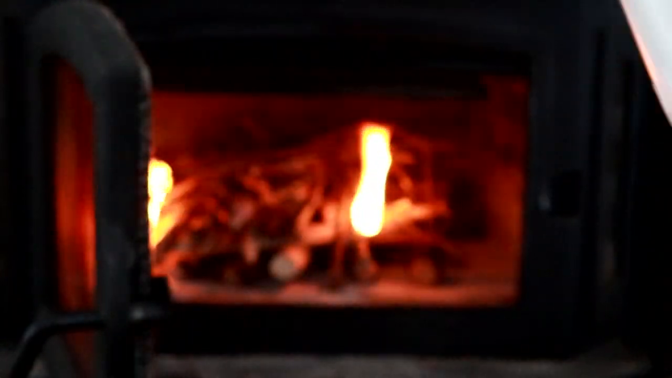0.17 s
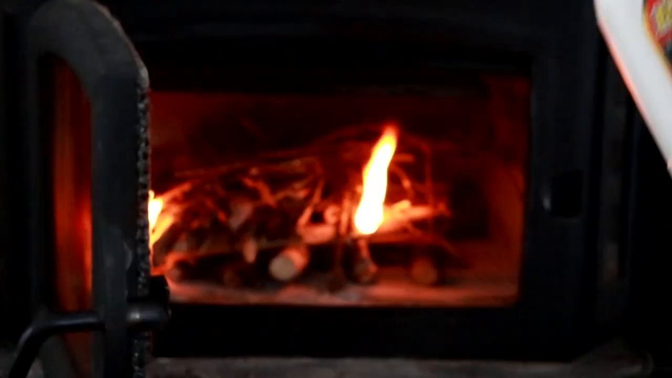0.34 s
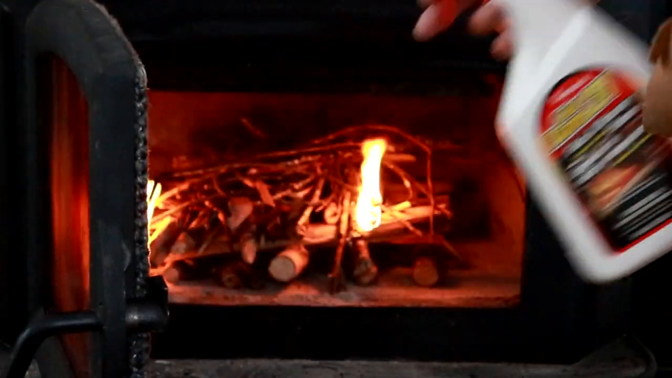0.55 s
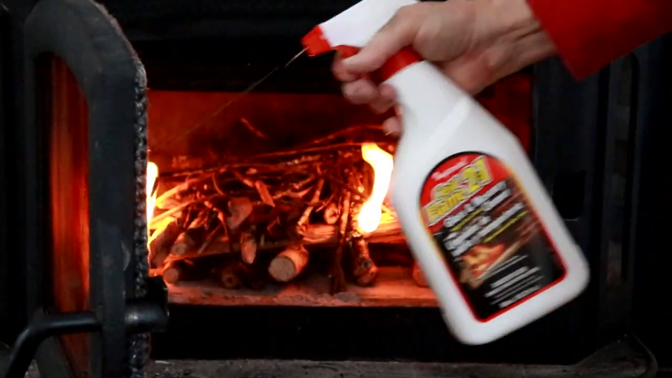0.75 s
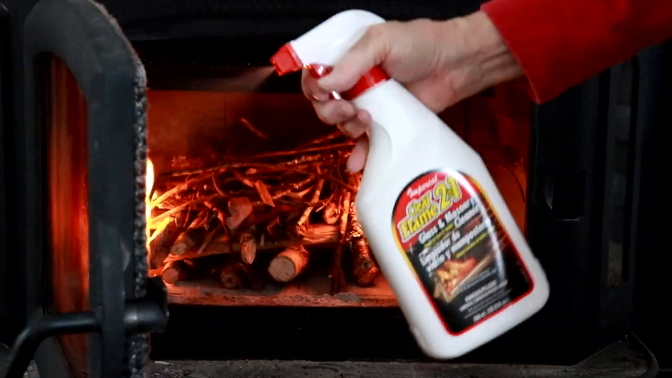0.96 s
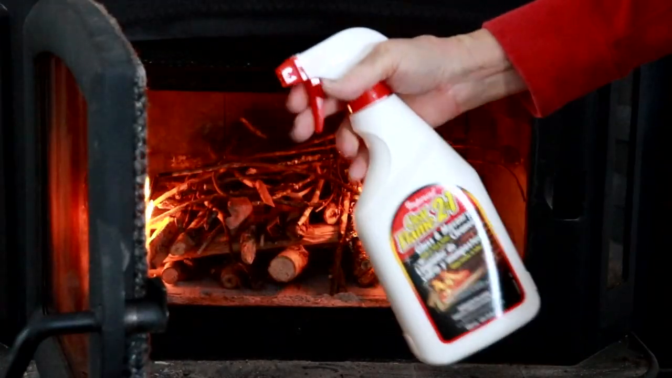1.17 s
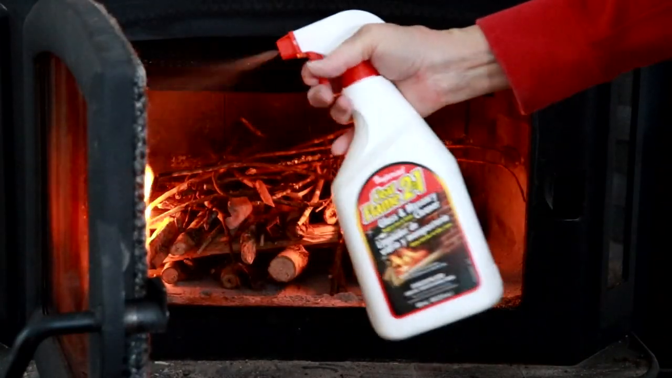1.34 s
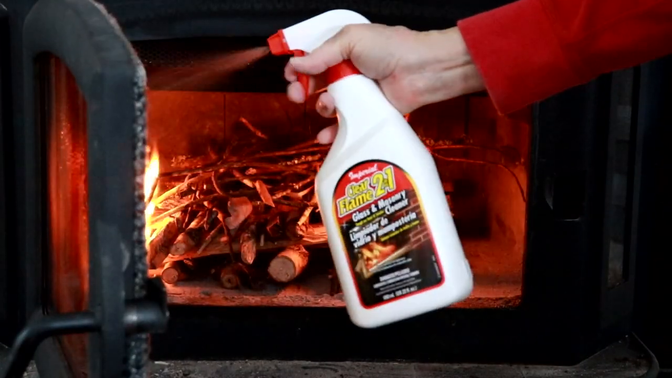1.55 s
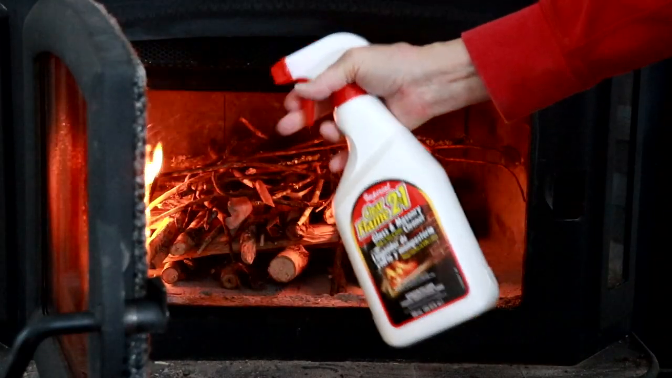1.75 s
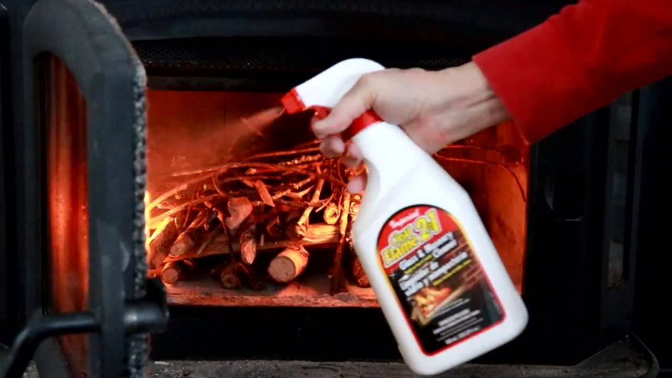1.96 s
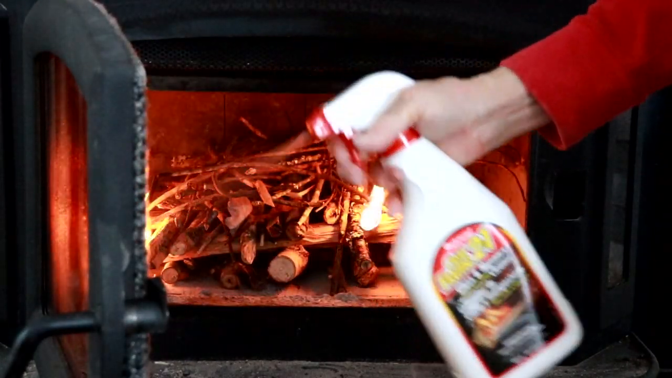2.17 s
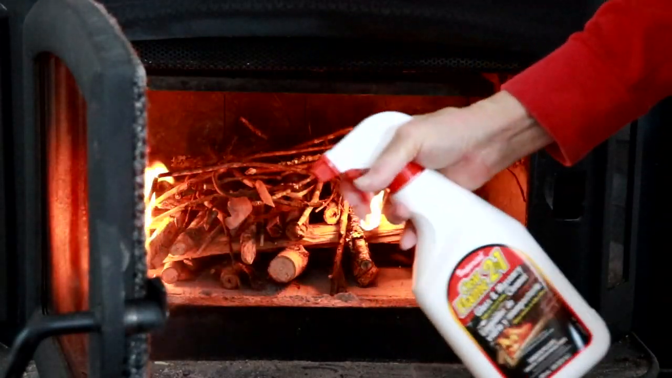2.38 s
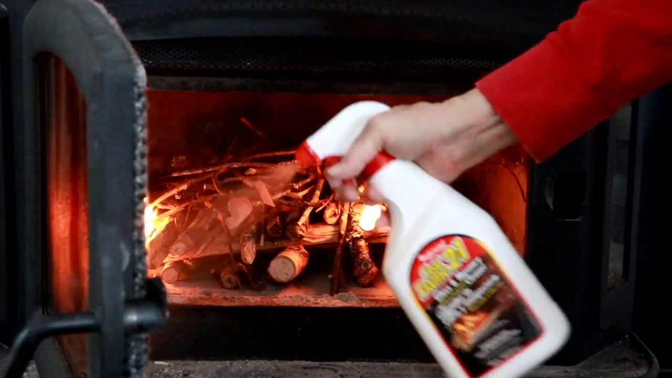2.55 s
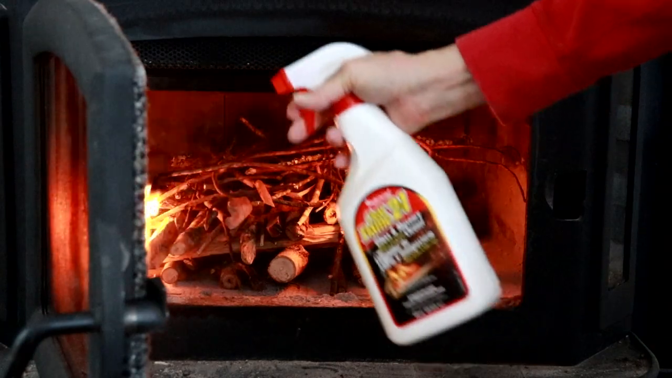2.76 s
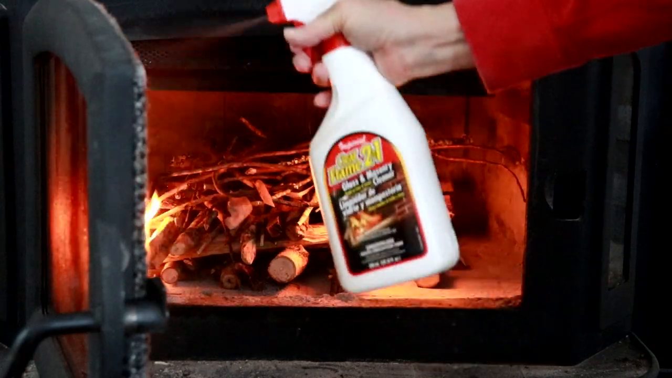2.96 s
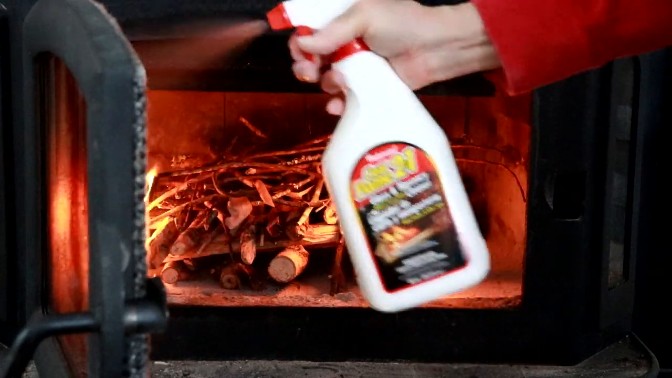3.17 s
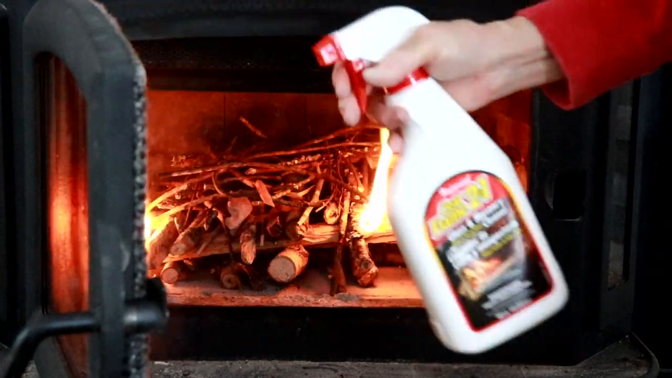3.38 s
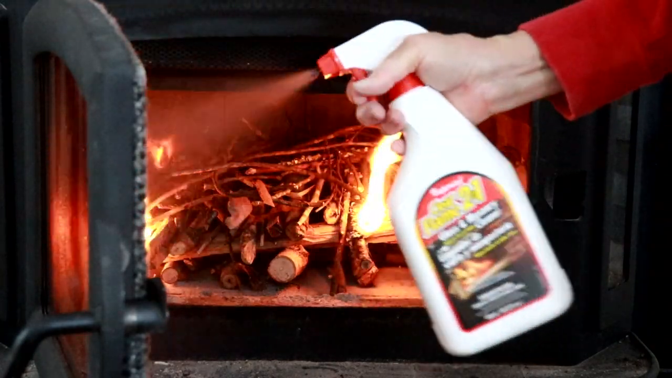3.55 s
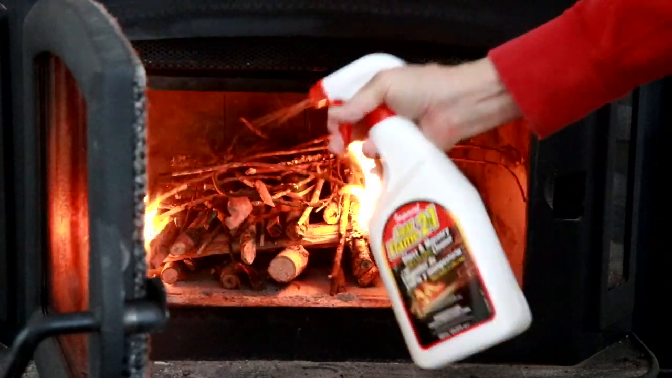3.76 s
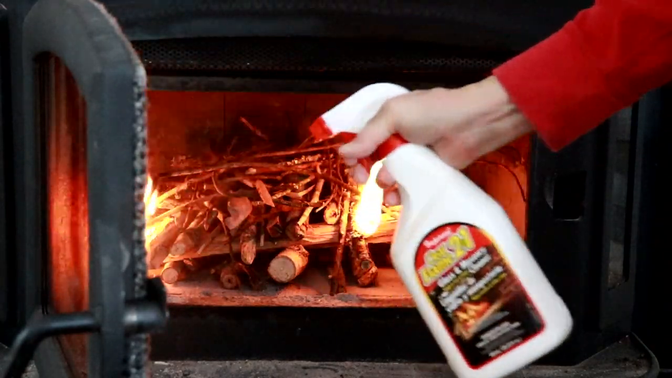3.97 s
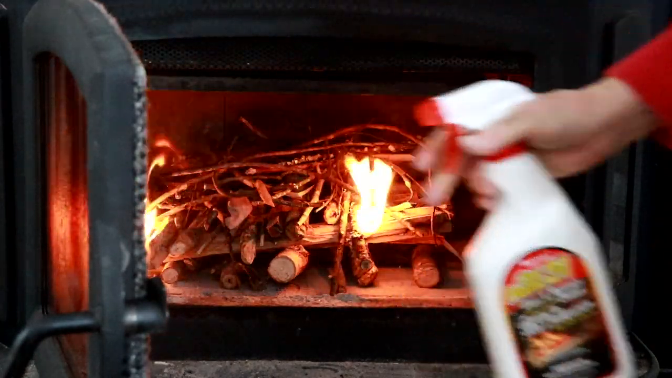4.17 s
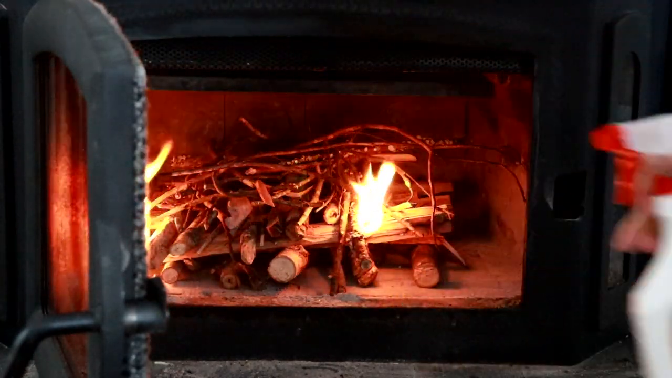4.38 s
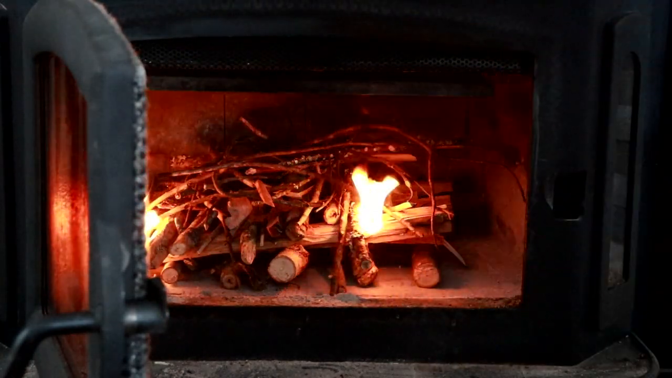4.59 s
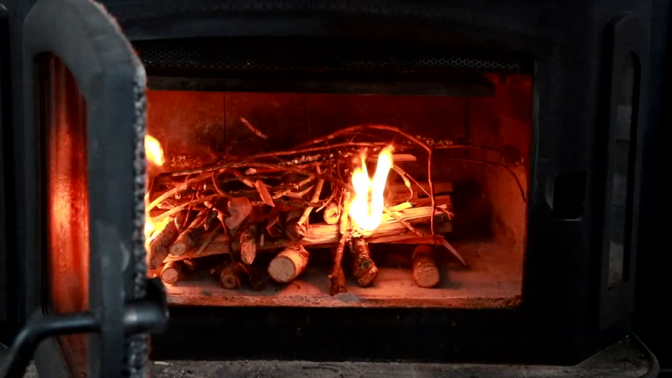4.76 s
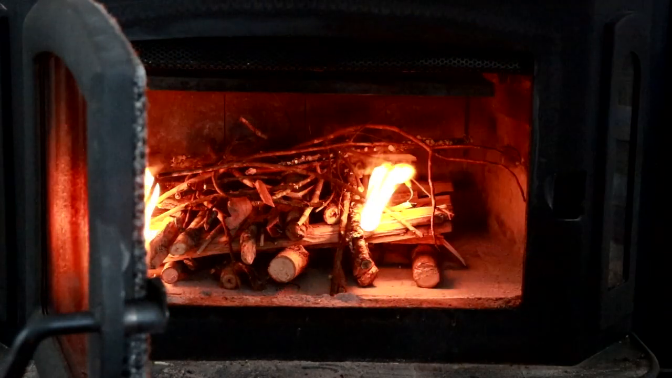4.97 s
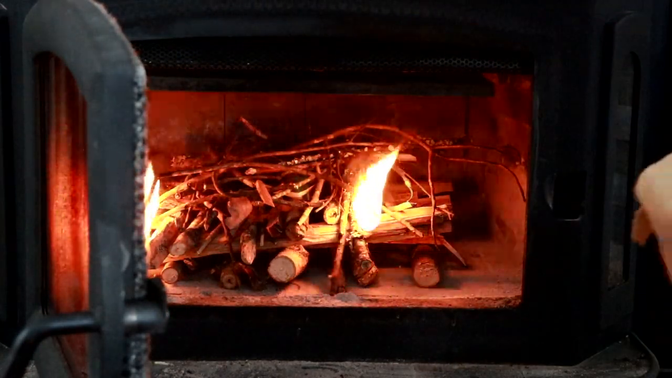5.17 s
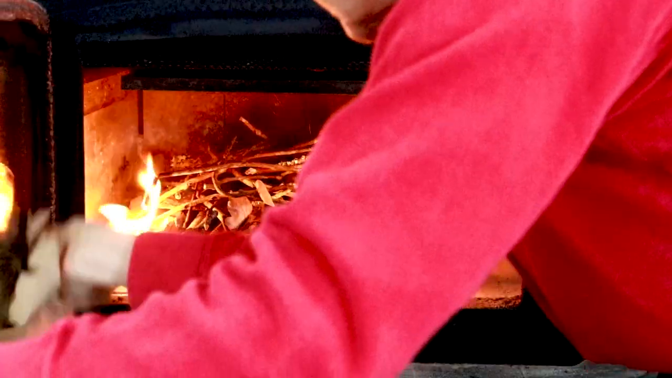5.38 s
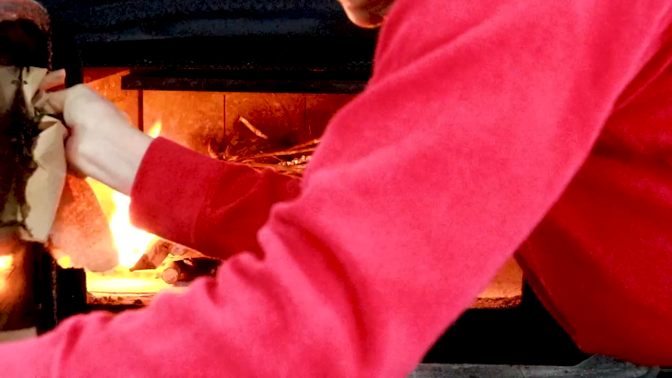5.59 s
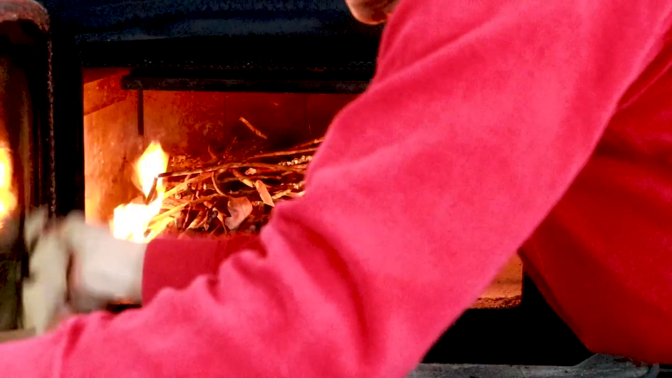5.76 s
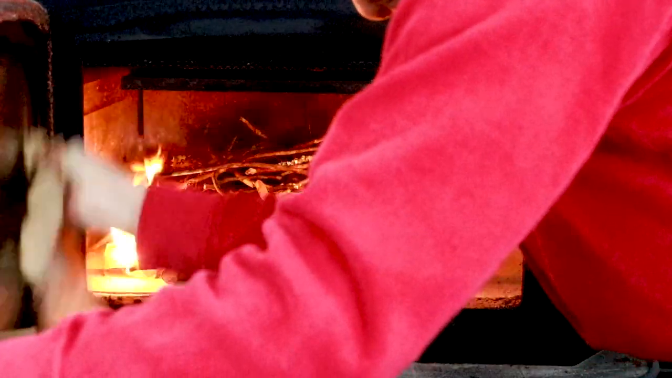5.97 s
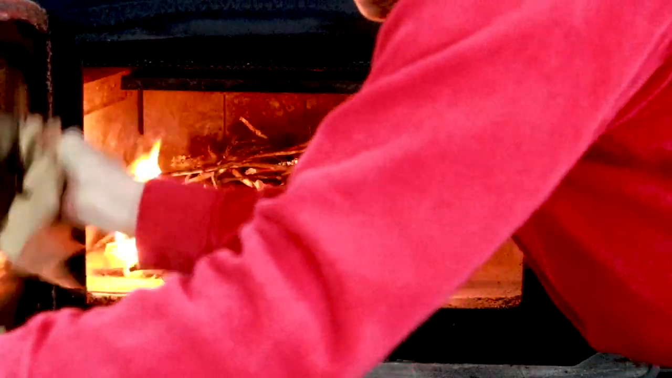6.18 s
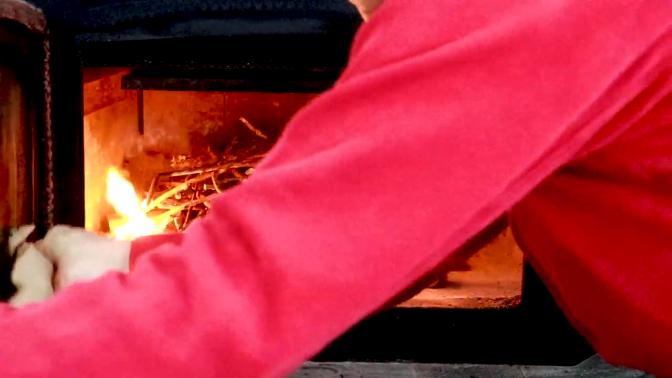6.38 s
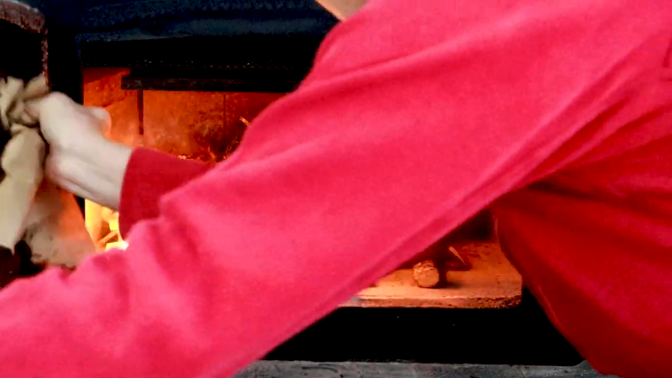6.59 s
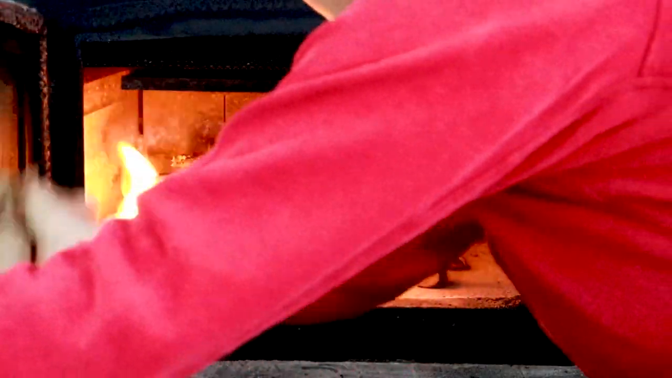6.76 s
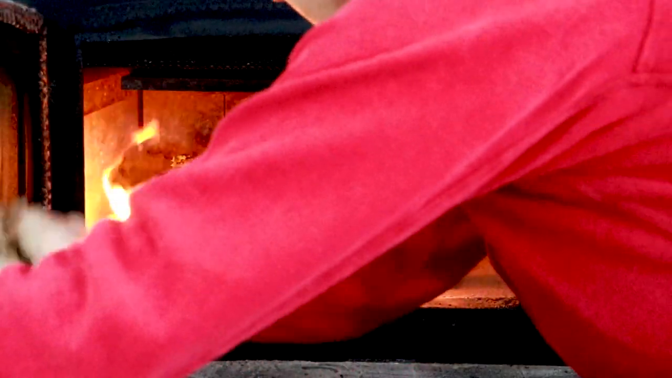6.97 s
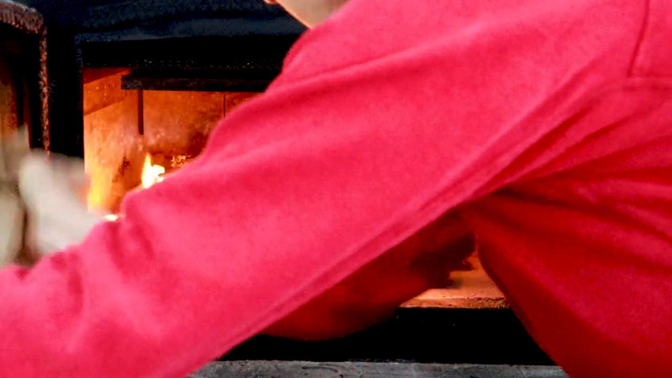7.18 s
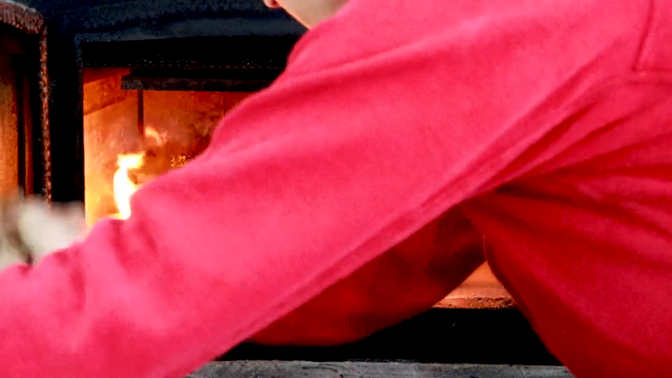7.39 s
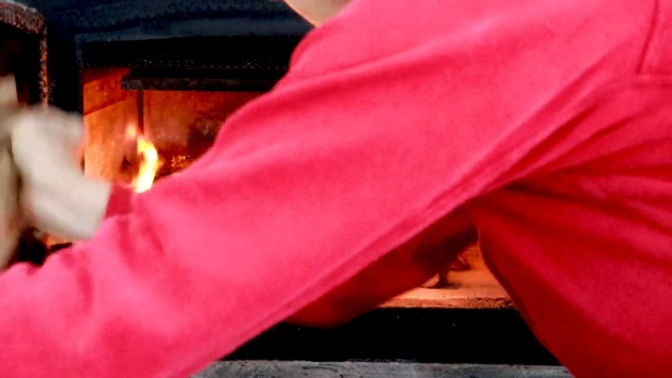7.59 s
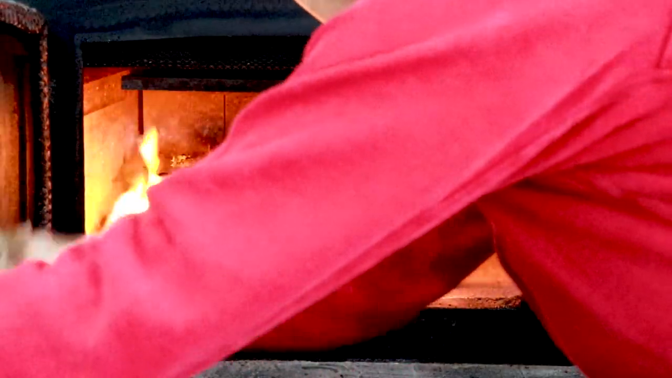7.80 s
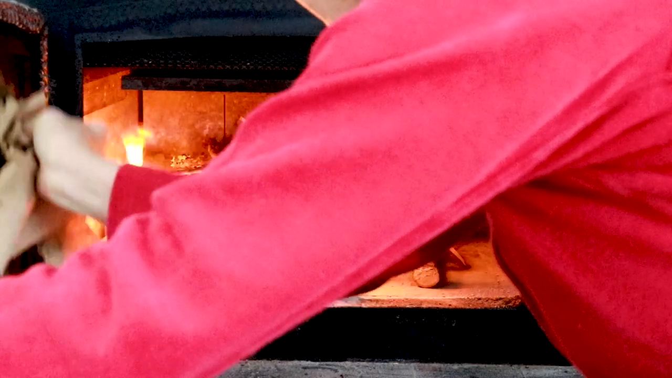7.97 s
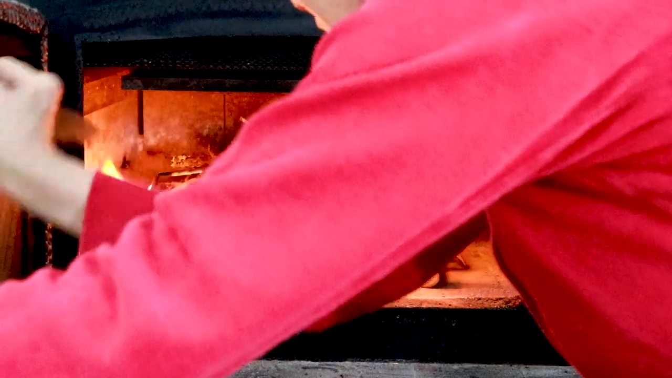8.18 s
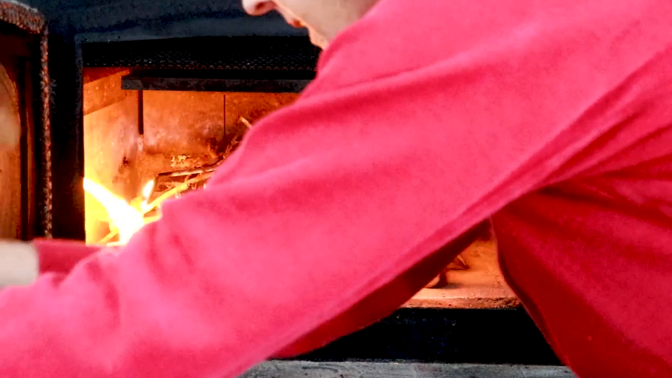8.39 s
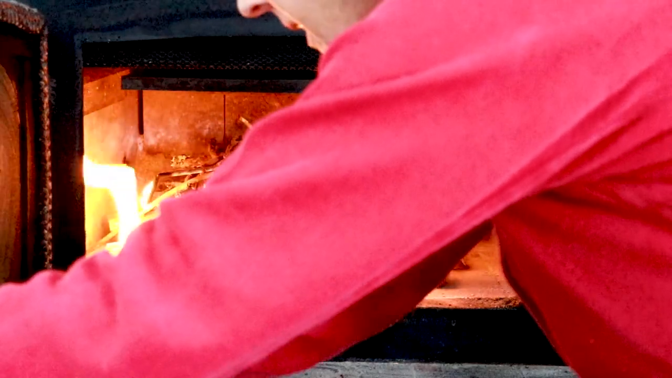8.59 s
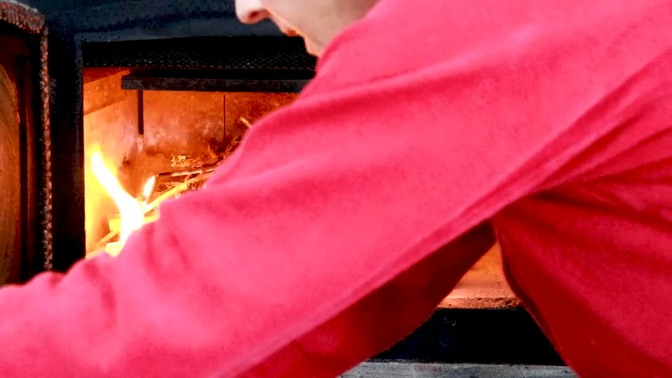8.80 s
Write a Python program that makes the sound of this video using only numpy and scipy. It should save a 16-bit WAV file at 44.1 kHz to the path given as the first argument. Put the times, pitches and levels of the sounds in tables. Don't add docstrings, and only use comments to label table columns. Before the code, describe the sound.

A trigger spray bottle bumps, clicks and hisses in steady squeezes, drops pattering on glass, then a wet rag scrubs the pane briskly indoors.

```python
import sys
import numpy as np
from scipy import signal
from scipy.fft import rfft, irfft, next_fast_len
from scipy.io import wavfile
from scipy.ndimage import uniform_filter1d, map_coordinates

SR = 44100
rng = np.random.default_rng(int(sys.argv[2]) if len(sys.argv) > 2 else 0)


def invert_db(x):
    u = np.asarray(x, float) / 20
    return 10 ** u


def master(y):
    cut = np.clip(np.atleast_2d(y).T, -1, 1)
    pcm = np.round(cut * 32767)
    wavfile.write(sys.argv[1], SR, pcm.astype(np.int16))


N = 389844

# [pull t/s, click level/dB, loudest ring f/Hz, flow level/dB, wait until full flow/s]
SQUEEZES = [(1.6224, -24, 7450, -40, 0.073), (1.93, -22, 2300, -38, 0.082),
            (2.258, -21, 3000, -38.5, 0.085), (2.573, -22, 2720, -38.5, 0.079),
            (2.894, -20, 3170, -39, 0.078), (3.219, -20, 6440, -38.5, 0.08),
            (3.534, -23, 2900, -37.5, 0.069), (3.8622, -17.5, 6600, -40, 0.08)]
# [f/Hz, likeness 0..1]
NEAR_ALIKE = [(300, 1), (1400, 0.98), (3000, 0.52), (7000, 0.42), (15000, 0.57)]


def unit(x):
    return x / np.sqrt(np.mean(x ** 2) + 1e-20)


def along(points, hz):
    f, v = np.transpose(points)
    return np.interp(np.log(hz + 1), np.log(f + 1), v)


def wobble(rate):
    knots = rng.standard_normal(int(N * rate / SR) + 4)
    return map_coordinates(knots, [np.arange(N) * rate / SR])


def filtered(x, response):
    m = next_fast_len(N + SR // 2)
    return irfft(rfft(x, m) * response(np.fft.rfftfreq(m, 1 / SR)), m)[..., :N]


def resonance(f, centre_hz, width_hz):
    return 1j * f * width_hz / (centre_hz ** 2 - f * f + 1j * f * width_hz)


def high_pass(x, corner_hz):
    return filtered(x, lambda f: (1j * f / (corner_hz + 1j * f)) ** 3)


def curve(*tables):
    t = np.arange(N) / SR
    return sum(invert_db(np.interp(t, *np.transpose(table), -200, -200)) for table in tables)


def swells(rows):
    power, t = np.full(N, 1e-20), np.arange(N) / SR
    for s, hold, db, rise, fall, *start in rows:
        rise, fall = np.clip([rise, fall], .001, 1)
        first = max(s - 6 * rise, 0, *start)
        near = slice(round(first * SR), round((s + hold + 6 * fall) * SR))
        early = (s - t[near]) / rise
        late = (t[near] - s - hold) / fall
        away = np.maximum(np.maximum(early, late), 0)
        power[near] += invert_db(db - 10 * away ** 0.98) ** 2
    return np.sqrt(power)


def rush(spectrum, alike, patchy_db, grit_db, left_lead, shape=None):
    grains = invert_db(grit_db * wobble(900)) * rng.standard_normal((2, N))
    hz, t, z = signal.stft(grains, SR, nperseg=512)
    field = uniform_filter1d(rng.standard_normal(z.shape[1:]), 6, 0)
    field = uniform_filter1d(field, 8, 1)
    z = z * invert_db(np.clip(patchy_db, 0, 1.2) * unit(field) + along(spectrum, hz)[:, None])
    if shape:
        z = z * shape(hz[:, None], t)
    turn = np.arccos(np.clip(along(alike, hz), -1, 1))[:, None] / 2
    mid, side = z[0] * np.cos(turn), z[1] * np.sin(turn)
    lead = np.exp(1j * np.pi * hz * left_lead / 1000)[:, None]
    pair = np.array([(mid + side) * lead, (mid - side) / lead])
    return unit(signal.istft(pair, nperseg=512)[1][:, :N])


def ring(modes, t, spread):
    luck = rng.standard_normal((len(modes), 2))
    total = 0
    for (hz, db, t60), (strength, detune) in zip(modes, luck):
        fade = invert_db(db + 2.5 * strength - 60 * t / t60)
        total = total + fade * np.sin(2 * np.pi * hz * (1 + spread * detune) * t)
    return total


def air():
    # [f/Hz, level/dB per Hz]
    draught_colour = [(15, -50), (25, -20), (49, -2.5), (148, -14), (183, -9), (281, -8), (349, -14),
                      (410, -8), (722, -11.5), (804, -10.5), (7700, -18), (15500, -27)]
    # [f/Hz, likeness 0..1]
    air_alike = [(60, 0.33), (180, 0.24), (550, 0.36), (1650, 0.33), (4970, 0.026), (15000, 0.06)]
    # [f/Hz, level/dB per Hz]
    fleece = [(120, -31), (200, -7.5), (419, -16.5), (459, -8), (560, -14.5), (1410, -9.5), (1630, -8.5),
              (4160, -13), (15000, -28.5)]
    # [t/s, level/dB]
    sleeve = [
        [(0.0, -45.5), (0.222, -42.5), (0.49, -53.5), (0.508, -66), (0.56, -57), (0.632, -43), (0.72, -47)],
        [(4.11, -58), (4.25, -62.5), (4.446, -50.5), (4.462, -65), (4.7, -70)],
    ]
    # [t/s, level/dB]
    far_sleeve = [(4.7, -72.5), (4.9, -53), (5.086, -49.5), (5.156, -43.5), (5.27, -56)]
    draught = rush(draught_colour, air_alike, patchy_db=3.0, grit_db=1.46, left_lead=.001)
    draught = invert_db(-50 + 0.13 * wobble(2.94)) * draught
    note = filtered(rng.standard_normal(N), lambda f: resonance(f, centre_hz=66.4, width_hz=12.0))
    rustle = rush(fleece, [(300, .6), (3000, .3)], patchy_db=1.2, grit_db=2.5, left_lead=-.19)
    far = curve(far_sleeve) * filtered(rustle, lambda f: 1 / (1 + (f / 2600) ** 2))
    near = curve(*sleeve) * invert_db([[-1.5], [1.5]]) * rustle
    return draught + invert_db(-65.5) * unit(note) + far + near


def room(x):
    # [f/Hz, t60/s]
    walls = [(200, 0.54), (2000, 0.67), (10000, 0.19)]
    # [f/Hz, likeness 0..1]
    walls_alike = [(250, .8), (900, 0)]
    hz, t, z = signal.stft(rng.standard_normal((2, SR // 2)), SR, nperseg=256)
    turn = np.arccos(along(walls_alike, hz))[:, None] / 2
    z = z[0] * np.cos(turn) + z[1] * np.sin(turn) * [[[1]], [[-1]]]
    fade = invert_db(-60 * t / along(walls, hz)[:, None])
    tail = signal.istft(z * fade, SR, nperseg=256)[1]
    late = np.pad(x, (150, 0))[None]
    return signal.fftconvolve(late, tail / np.linalg.norm(tail[0]), axes=1)[:, :N]


def knocks():
    # [t/s, peak level/dB, hardness/dB per octave]
    bumps = [(.379, -39.5, 9.5), (.399, -39, 7), (0.5055, -22.5, 1), (.55, -38, -6), (.536, -37, -2),
             (0.692, -39, 11.5), (0.726, -40, 6), (0.9763, -16, 5.5), (.996, -17, -5), (1.049, -26.5, -14),
             (1.074, -42.5, 14)]
    # [f/Hz, level/dB, t60/s]
    shell = [(147, -9.5, .1), (227.5, -2.5, .15), (274.6, 2.5, 0.12), (526, -8, .05), (710, -14, .09),
             (936, -10, 0.053), (1230, -15, 0.027)]
    # [f/Hz, level/dB per Hz]
    thud = [(120, -5), (300, 2.5), (600, 1.5), (1400, -10), (2500, -18), (6000, -30)]
    # [t/s, level/dB]
    slosh = [
        (0.52, -40),
        (0.578, -45),
        (0.64, -59),
        (0.768, -54),
        (0.86, -71),
    ]
    out, slaps, t = np.zeros(N + SR), np.zeros(N + SR), np.arange(SR // 4) / SR
    pistons = [(s + 0.012, -39.5, -6) for s, *_ in SQUEEZES]
    for s, db, hard_db in bumps + pistons:
        modes = [(hz, level + hard_db * np.log2(hz / 280), t60) for hz, level, t60 in shell]
        at = round(s * SR)
        out[at:][:len(t)] += invert_db(db - 12.5) * ring(modes, t, spread=0.034)
        slaps[at:][:len(t)] += invert_db(db + hard_db - 19.5 - 60 * t / 0.25)
    slap = slaps[:N] * rush(thud, [(300, 0.99), (1400, 0.45)], patchy_db=0.0, grit_db=4.5, left_lead=.001)
    heave_colour = [(20, -1.0), (35, 0), (90, -11), (200, -17), (400, -92)]
    heave = rush(heave_colour, [(50, 1.0)], patchy_db=.5, grit_db=0.0, left_lead=.001)
    return high_pass(out[:N], corner_hz=45), slap + curve(slosh) * heave


def froth():
    # [t/s, hold/s, level/dB]
    foam = [(6.783, 0.021, -41), (6.838, 0.015, -40), (7.79, .03, -54), (7.95, .05, -55),
            (8.187, .012, -46), (8.25, .09, -53), (8.36, .03, -48), (8.42, 0.12, -54), (8.542, .012, -42.5),
            (8.57, 0.11, -46.5), (8.686, 0.036, -44.5)]
    colour = [(5000, -19), (8500, 0.5), (11000, -2), (13500, -7), (16000, -15)]
    bursts = swells([(*row, 0.0033, 0.032) for row in foam])
    return bursts * invert_db(-2.0) * rush(colour, NEAR_ALIKE, patchy_db=-4.0, grit_db=2.5, left_lead=0.11)


def rag():
    # [t/s, hold/s, scrub level/dB, rise/s for 10 dB, fibre over scrub/dB]
    strokes = [(5.2755, 0.013, -46, -0.1, -2.5), (5.29, 0.15, -48, 0.02, -7), (5.483, 0.046, -45.5, 0, -2),
               (5.553, 0.05, -37, 0.0273, -0.5), (5.63, .045, -39, .03, 0), (5.771, 0.14, -44, 0.02, -4),
               (6.1, 0.035, -41, 0.05, -2.5), (6.22, 0.071, -47, 0.2, -6), (6.343, 0.04, -41.5, 0.02, -2.5),
               (6.45, 0.092, -52, 0.2, -18), (6.569, 0.035, -41.5, 0, -4), (6.631, 0.035, -38, 0.12, 0.5),
               (6.683, 0.017, -45, 0, -7), (6.788, 0.022, -44, 0, -1.5), (6.836, 0.088, -42.5, 0, -5.5),
               (6.937, .025, -43, 0, -5.5), (7.017, 0.016, -45, .008, -18), (7.07, 0.077, -52, 0.3, -3),
               (7.308, 0.095, -48.5, 0.04, -3.5), (7.448, 0.11, -52.5, 0, -6), (7.633, .08, -64, -1, -10),
               (7.74, .08, -54, 0.1, -2.5), (7.83, 0.028, -44, 0.03, -12), (7.905, 0.1, -49.5, 0.07, -7),
               (8.01, 0.03, -45, 0.04, 1), (8.05, 0.036, -41.5, 0.04, -0.5), (8.123, 0.036, -49, .03, -12),
               (8.191, 0.041, -47, 0.04, 0), (8.328, 0.077, -53.5, 0.4, 3.5),
               (8.546, 0.035, -46, -0.03, -4), (8.594, 0.052, -45.5, 0, -6), (8.68, 0.035, -45, 0.07, -4),
               (8.822, 0.022, -46.5, .09, -4.5)]
    # [t/s, scrub level/dB, fibre over scrub/dB]
    snags = [
        (7.028, -43.5, -21),
        (7.412, -46.5, -2),
        (7.55, -45, -10),
        (7.862, -41, -6),
        (8.548, -50, 3),
        (5.675, -45.5, -5),
    ]
    # [t/s, lean on the pane/dB, air pocket f/Hz]
    hand = [(5.28, -52, 1700), (5.5, -54.5, 2500), (5.55, -51, 1460), (5.61, -56, 1950),
            (5.628, -58.5, 3000), (5.65, -52.5, 2510), (5.69, -52.5, 3000), (5.8, -53, 2400),
            (6.0, -59, 2480), (6.4, -57, 2470), (6.54, -49.5, 1660), (6.6, -53.5, 1720), (6.65, -48, 2200),
            (6.75, -55, 2100), (6.8, -48, 1800), (6.86, -48.5, 2100), (6.95, -57, 2600), (7.03, -59, 2400),
            (7.1, -57.5, 2100), (7.85, -56, 1700), (7.97, -57, 1550), (8.02, -58, 2300), (8.07, -58, 1800),
            (8.2, -60, 2500), (8.3, -56.5, 2400), (8.55, -55, 2200), (8.6, -56, 2600), (8.72, -59, 2920),
            (8.84, -66.5, 2200)]
    # [f/Hz, width/Hz, level/dB]
    pane = [(167, 42, 3.5), (275, 27.5, 10), (356, 27, 2), (444, 22, 2.5), (634, 28, -11)]
    # [f/Hz, level/dB per Hz]
    scrub_colour = [(240, -36), (400, -23.5), (450, -34), (486, -10), (874, -5), (1650, -1.5), (4570, -6.5),
                    (9000, -18), (11700, -45), (19800, -120)]
    # [f/Hz, level/dB per Hz]
    fibre_colour = [(1760, -19), (3000, -0.5), (8010, -3.5), (12100, -11), (15500, -19.5)]
    scrubs, brushes = [], []
    for s, hold, db, rise, over_db in strokes:
        fall = 0.036 + 0.49 * rise
        scrubs.append((s, hold, db, rise, fall))
        brushes.append((s, hold, db + over_db, 0.84 * rise, 0.84 * fall))
    for s, db, over_db in snags:
        scrubs.append((s, 0.0012, db, 0.0042, 0.0041))
        brushes.append((s, 0.0012, db + over_db, 0.0042, 0.0041))
    effort, speed = swells(scrubs), swells(brushes)

    def bump(hz, centre):
        return np.exp(-.5 * (np.log(hz / centre + 1e-3) / 0.21) ** 2)

    def pocket(hz, t):
        centre = np.interp(t, *np.transpose(hand)[::2])
        effort_db = 20 * np.log10(np.interp(t * SR, np.arange(N), effort))
        depth_db = np.clip(.5 * (effort_db + 53), 0, 6)
        gain = invert_db(depth_db * (bump(hz, centre) + 0.56 * bump(hz, 2.6 * centre)))
        return gain / np.sqrt(np.mean(gain[10:48] ** 2, axis=0))

    def door(f):
        modes = [(-1) ** k * invert_db(db) * resonance(f, c, w) for k, (c, w, db) in enumerate(pane)]
        return 0.18 + sum(modes)

    judder = .7 * wobble(45)
    scrub = rush(scrub_colour, NEAR_ALIKE, patchy_db=0.0, grit_db=1.5, left_lead=0.073, shape=pocket)
    scrub = invert_db(3.0 + 1.5 * judder) * scrub
    fibre = rush(fibre_colour, NEAR_ALIKE, patchy_db=3.5, grit_db=1.0, left_lead=0.055)
    fibre = invert_db(5.0 + 0.86 * judder) * fibre
    push_colour = [(60, -22), (150, -17.0), (800, 1.0), (1500, -21)]
    push = rush(push_colour, [(200, 1.0)], patchy_db=8.0, grit_db=2.0, left_lead=0.05)
    lean = curve(np.array(hand)[:, :2]) * (effort / invert_db(-40.5)) ** 0.42
    return effort * scrub + speed * fibre + lean * unit(filtered(push, door))


def whistle():
    # [f/Hz, width/Hz, level/dB]
    bore_modes = [(4500, 70, -4), (6102, 60, 0), (6946, 60, -1), (7830, 60, -3), (8270, 60, -3),
                  (10922, 70, -4), (11668, 60, -4), (14150, 200, -6)]
    # [t/s, hold/s, level/dB, rise/s, fall/s for 10 dB]
    puff = (1.082, .016, -27, .008, .008)

    def bore(f):
        return sum((-1) ** k * invert_db(db) * resonance(f, c, w) ** 2 for k, (c, w, db) in enumerate(bore_modes))

    return swells([puff]) * unit(filtered(rng.standard_normal(N), bore))


def spray():
    # [f/Hz, level/dB per Hz]
    nozzle = [(1200, -50), (2200, -21), (3500, -6.5), (6000, -0.5), (8500, -2), (11000, -5), (16000, -21)]
    # [f/Hz, level/dB per Hz]
    spit_colour = [(5000, -49), (8000, -14), (11000, 0.5), (14000, 1), (16500, -4.5)]
    # [f/Hz, level/dB per Hz]
    patter = [(180, -32), (300, -15.5), (926, -2.5), (1170, -1), (1340, -1.5), (1450, -1.5), (2520, -1),
              (7670, -8), (12000, -47), (15600, -50), (22000, -120)]
    # [opening peak/dB, shutting t/s, shutting peak/dB]
    valve_rows = [(-27, 1.7994, -46), (-40, 2.1131, -29), (-25, 2.4418, -33), (-26, 2.7556, -27.5),
                  (-28, 3.3, -33), (-28.5, 3.3982, -27), (-21, 4, -26), (-24, 4.0437, -29)]
    # [t/s, hold/s, level/dB, rise/s, fall/s for 10 dB]
    puffs = [
        (0.727, 0.018, -36, .004, 0),
        (0.757, 0.0059, -32, 0.016, 0.06),
        (1.036, 0.025, -35, 0.018, 0),
        (1.083, 0.015, -20, 0.012, 0.01),
        (1.108, 0.027, -29, 0.017, 0.09),
        (1.324, 0.016, -34.5, 0.0087, 0.13),
        (1.427, 0.034, -43.5, .05, -0.25),
        (1.643, 0.014, -44.5, 0.011, 0.3),
    ]
    # [t/s, hold/s, level/dB, rise/s, fall/s for 10 dB]
    dribbles = [
        (0.795, .01, -57, .03, 0.43),
        (1.196, 0.044, -43.5, 0.012, 0),
        (1.28, 0.03, -41, .002, 0),
        (1.388, 0.031, -40.5, .05, 0.02),
    ]
    valve, t = np.zeros(N), np.arange(SR // 10) / SR
    shuts = [row[1:] for row in valve_rows]
    opens = [(pull[0] + 0.012, row[0]) for pull, row in zip(SQUEEZES, valve_rows)]
    for s, db in shuts + opens:
        valve[round(s * SR):][:len(t)] += invert_db(db - 11 - 60 * t / .07) * (1 - np.exp(-t / .002))

    def flow(over_db, slow):
        return [(s + wait, 0.055, db + over_db, slow * 0.05, 0.04, s) for s, _, _, db, wait in SQUEEZES]

    def squirts(over_db):
        return [(s + 0.0083, .002, -38.5 + over_db, .002, 0.0081) for s, *_ in SQUEEZES]

    gasps = [(s, hold, db - 3, rise, 0.4 * fall) for s, hold, db, rise, fall in puffs]
    flecks = [(s, hold, -43.5 + 0.46 * (db + 29), rise, fall) for s, hold, db, rise, fall in puffs]
    jet = swells(flow(0, 0.93) + squirts(-19) + puffs + dribbles)
    gas = swells(flow(-11.5, 2.3) + gasps)
    wet = swells(flow(1, 0.91) + squirts(0) + flecks + dribbles)
    hiss = jet * invert_db(-0.5) * rush(nozzle, NEAR_ALIKE, patchy_db=4.2, grit_db=1.5, left_lead=0.0052)
    gusts = gas * invert_db(3.5 + 1.2 * wobble(90)) + valve
    spit = gusts * rush(spit_colour, NEAR_ALIKE, patchy_db=3.5, grit_db=2.0, left_lead=0.013)
    splashes = wet * invert_db(3.0 + 0.65 * wobble(60))
    drops = splashes * rush(patter, NEAR_ALIKE, patchy_db=2.0, grit_db=1.0, left_lead=0.0066)
    return hiss + spit + drops


def trigger():
    # [f/Hz, level/dB, t60/s]
    lever = [(2700, -7, .007), (4300, -8, .007), (5600, -6, .006), (7300, -5, .006), (9000, -10, .005)]
    # [f/Hz, level/dB, t60/s]
    stop = [(2837, -5, .007), (4027, -8, .006), (5265, -3, .007), (5905, -5, .009), (8226, -10, .005),
            (8877, -9, .005), (14500, -19, .003)]
    # [f/Hz, level/dB, t60/s]
    bottle = [(800, -9, .03), (980, -6, .03), (1165, -3, .05), (1230, 1, .06), (1420, -5, .03)]
    # [t/s, peak level/dB, loudest ring f/Hz]
    return_rows = [(1.514, -22.5, 7400), (1.842, -22, 5400), (2.152, -22, 4300), (2.488, -24, 5270),
                   (2.801, -22, 5830), (3.123, -30.5, 6590), (3.4477, -25, 7400), (3.7506, -24, 7300),
                   (4.094, -23, 7500)]
    # [t/s, peak level/dB, loudest ring f/Hz, bottle/dB, snap/dB]
    fumbles = [
        (0.7278, -19, 3400, -19, -16),
        (0.8812, -14, 4180, -13, -16),
        (0.921, -28.5, 2380, 2.5, -29),
        (1.0331, -22, 5960, -12, -17),
        (1.5316, -23, 4570, -12, -33),
        (1.5608, -27, 6140, -22, -34),
        (1.882, -32, 2210, -36, -28),
        (2.224, -32, 3230, -11, -27),
        (4.573, -36, 6960, -18, -26),
    ]
    # [t/s, peak level/dB, loudest ring f/Hz, bottle/dB, snap/dB]
    slam = (1.2672, 0, 7270, -17, -42)
    # [t/s, level/dB]
    facets = [(0, 0), (.0022, -11), (.0038, -13), (.0076, -19)]
    # [t/s, level/dB]
    creaks = [
        [(1.19, -55), (1.244, -62), (1.26, -43)],
        [(1.28, -39), (1.36, -46), (1.496, -56), (1.534, -53), (1.6, -54)],
    ]
    out, rattles, t = np.zeros(N + SR), np.zeros(N + SR), np.arange(SR // 8) / SR
    pulls = [(s, db, hz, -16.5, -26) for s, db, hz, *_ in SQUEEZES]
    returns = [(*row, -32, -34) for row in return_rows]
    seats = [(s + .0065, db - 12, 1.5 * hz ** .95, bottle_db, snap_db) for s, db, hz, bottle_db, snap_db in pulls]
    for s, db, hz, bottle_db, snap_db in fumbles + [slam] + pulls + returns + seats:
        own = invert_db(-60 * t / .005) * np.sin(2 * np.pi * hz * t)
        noise = rng.standard_normal((2, len(t) + 2))
        snap = invert_db(snap_db + 5 - 60 * t / .007) * np.diff(noise[0], 2)
        if db > -5:
            parts = ring(stop, t, spread=0)
        else:
            parts = invert_db(-1) * ring(lever, t, spread=.07)
        hollow = invert_db(bottle_db + 1.0) * ring(bottle, t, spread=0.014) * (1 - np.exp(-t / 0.00055))
        bite = 1 + 1.1 * np.exp(-t / .0006)
        rings = (bite * (own + parts) + hollow) * (1 - np.exp(-t / .00008))
        at = round((s + .0014) * SR)
        out[at:][:len(t)] += invert_db(db - 5) * (snap - rings)
        rattles[at:][:len(t)] += invert_db(db - 11 - 60 * t / .03) * noise[1, 2:]

    def echoes(f):
        return sum(invert_db(db) * np.exp(-2j * np.pi * f * s) for s, db in facets)

    dull = filtered(rattles[:N], lambda f: resonance(f, centre_hz=5200, width_hz=5000) ** 2)
    creak = filtered(rng.standard_normal(N), lambda f: resonance(f, centre_hz=1220, width_hz=170))
    creak = curve(*creaks) * invert_db(-5.0 + 2.5 * wobble(38.9)) * unit(creak)
    return high_pass(filtered(out[:N], echoes) + dull, corner_hz=690) + creak


def scene():
    clicks = trigger()
    bumps, heave = knocks()
    wet = spray() + rag() + froth()
    answers = invert_db(-8) * room(clicks) + invert_db(-16.5) * room(bumps) + invert_db(-10.0) * room(wet.mean(axis=0))
    rest = bumps + heave + wet + answers + air() + whistle()
    return clicks * invert_db([[-.4], [.4]]) + filtered(rest, lambda hz: hz < 15850)


def top_cut(x):
    return signal.sosfilt(signal.butter(12, 16520, fs=SR, output="sos"), x)


def record(dry):
    # [f/Hz, left minus right/dB]
    lean = [(60, 0), (180, 0.5), (550, 1.5), (1650, -1.5), (4970, -1.5), (15000, 0.5)]

    def microphones(hz):
        return invert_db(along(lean, hz) * np.array([[.5], [-.5]])) * (hz < 16500)

    mix = np.clip(filtered(dry, microphones), -1, 1)
    return top_cut(mix)


dry = scene()
out = record(dry)
master(out)
```